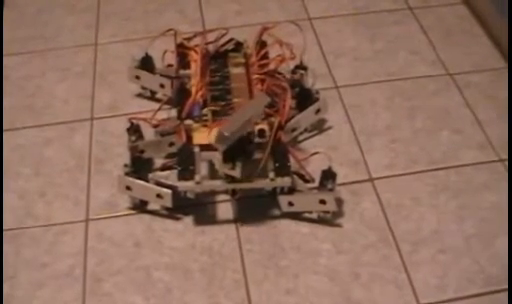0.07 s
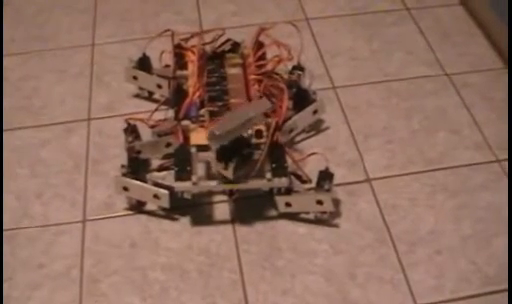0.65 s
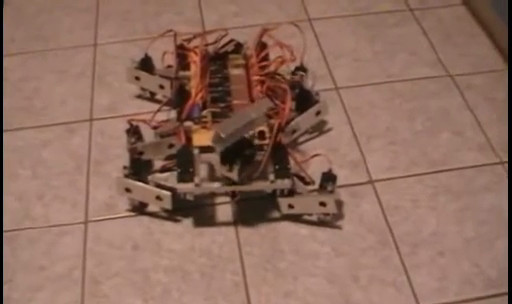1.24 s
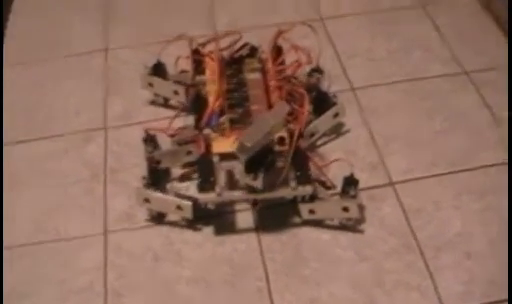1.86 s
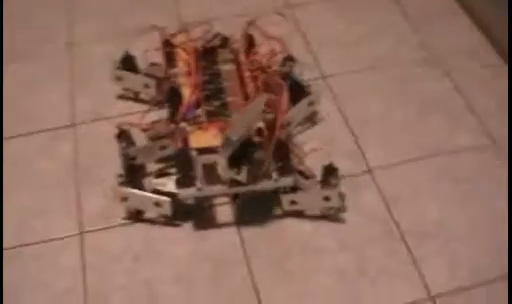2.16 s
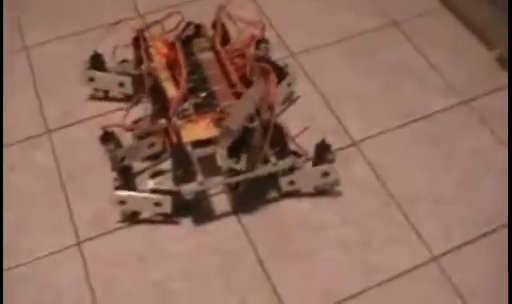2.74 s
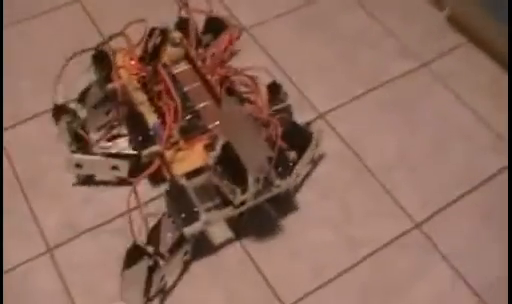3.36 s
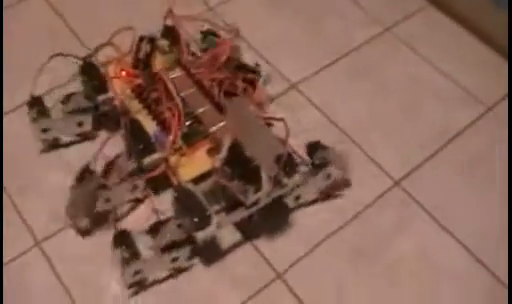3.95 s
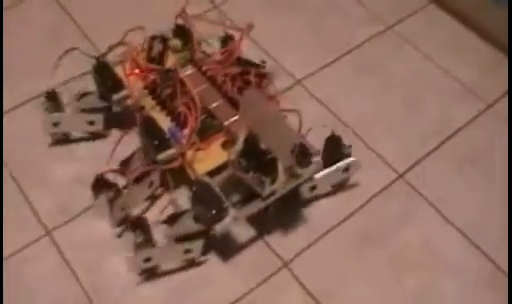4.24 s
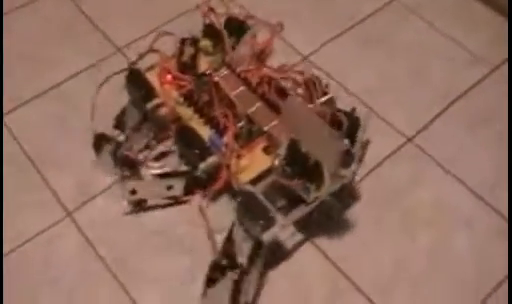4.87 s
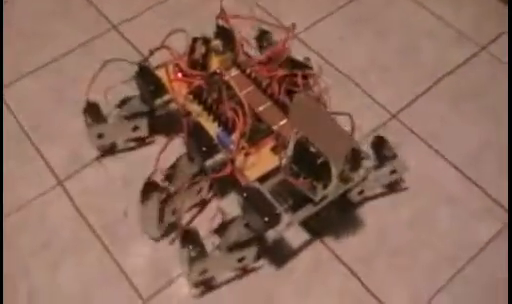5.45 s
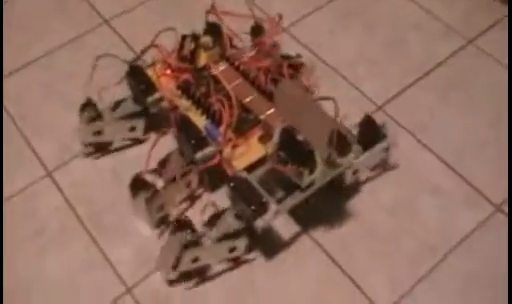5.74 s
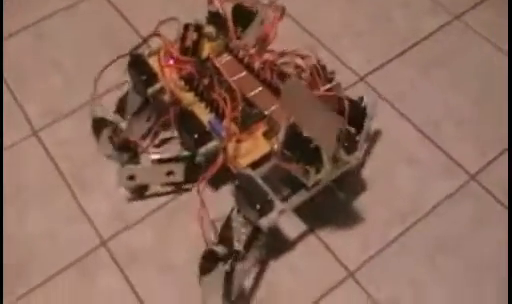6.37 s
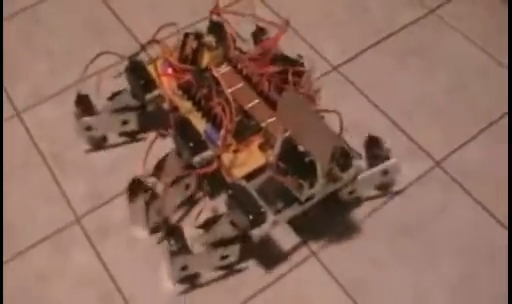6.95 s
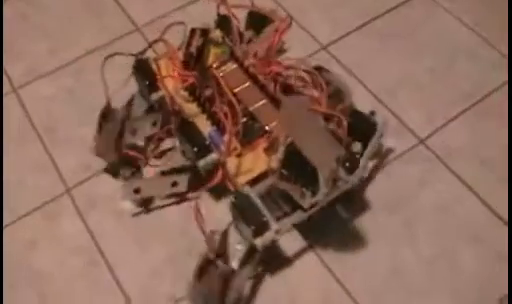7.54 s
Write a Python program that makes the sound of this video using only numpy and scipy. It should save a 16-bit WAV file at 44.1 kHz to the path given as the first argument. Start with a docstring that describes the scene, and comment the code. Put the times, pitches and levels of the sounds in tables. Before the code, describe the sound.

A small metal robot stands in a room, its servo motors giving faint, irregular, high twitches over a low electrical hum and hiss. After nearly three seconds it starts walking, much louder: gears whirr and growl in repeating surges with thin, high whines, while its feet clack down in groups and scrape on the tiles. The frame rattles with a short room echo, heard slightly to the right.

```python
"""A six-legged robot on tiles

A small sheet-metal robot stands still, its servos (the motors in its joints) twitching to hold
their position over a mains hum. Then it walks: the gears whirr in the same surges every stride,
and the feet clack down in groups and drag, making the frame and the room ring."""
import sys
import numpy as np
from scipy import signal
from scipy.fft import rfft, irfft
from scipy.io import wavfile

SR = 44100
rng = np.random.default_rng(int(sys.argv[2]) if len(sys.argv) > 2 else 0)


def inscribe(sig):
    """Save sig as 16-bit PCM at rate SR to the path in sys.argv[1].

    A 1-D sig is mono; a 2-D sig holds one channel per row.
    Samples are clipped to [-1, 1] before scaling.
    """
    pcm = np.round(np.clip(np.atleast_2d(sig).T, -1, 1) * 32767)
    wavfile.write(sys.argv[1], SR, pcm.astype(np.int16))


N = 335160
TIME = np.arange(N) / SR
HZ = np.maximum(np.fft.rfftfreq(2 * N, 1 / SR), 1)


def from_db(db):
    """Turn decibels into a gain to multiply by."""
    return 10 ** (np.asarray(db) / 20)


def unit_power(x):
    """Scale a sound or a filter to an average power of 1."""
    return x / np.sqrt(np.mean(abs(x) ** 2) + 1e-20)


def at_hz(points):
    """Join the points of a table into a curve over all pitches."""
    hz, value = np.transpose(points)
    return np.interp(np.log(HZ), np.log(hz), value)


def drift(per_s):
    """A random wobble around zero that glides to a new value per_s times a second."""
    knots = rng.standard_normal(4000)
    return np.interp(TIME * per_s, np.arange(len(knots)), knots)


def colour(spectrum):
    """A filter shaped by (pitch_hz, relative_db) points; it never rings ahead of the sound."""
    cepstrum = irfft(np.log(from_db(at_hz(spectrum))))
    return unit_power(np.exp(rfft(2 * cepstrum[:N], 2 * N)))


def resonances(modes):
    """A filter that rings at each (pitch_hz, width_hz, relative_db); narrow ones ring longer."""
    return unit_power(sum((-1) ** k * from_db(db) / (1 + 1j * (HZ ** 2 - hz ** 2) / (HZ * width))
                          for k, (hz, width, db) in enumerate(modes)))


def through(x, response):
    """Pass a sound through a filter."""
    return irfft(rfft(x, 2 * N) * response)[..., :N]


def grains(per_s, spread_db, size=N):
    """Random tiny impacts of uneven strength."""
    strengths = from_db(spread_db * np.minimum(rng.exponential(1, size), 4))
    signs = rng.choice([-1, 1], size)
    return unit_power(strengths * signs * (rng.random(size) < per_s / SR))


def swell(start, length, attack_s, release_s):
    """A gain that reaches 1 at the start time, holds, then dies away."""
    rise = np.maximum((start - TIME) / attack_s, 0) ** 2
    fall = np.maximum((TIME - start - length) / release_s, 0)
    return np.exp(-np.minimum(rise + fall, 20))


def walking(start_s=2.75, run_up_db_per_s=220):
    """A gain that rises to 1 as the servos run up for the walk."""
    return from_db(np.clip((TIME - start_s) * run_up_db_per_s, -120, 0))


def every_stride(rows, front_feet_land_s=3.26, stride_s=1.436):
    """Repeat rows for five strides, from one before the given landing of the front feet."""
    return [(front_feet_land_s + k * stride_s + s, *rest) for k in range(-1, 4) for s, *rest in rows]


# Low room noise that comes from all around: pitch_hz, relative_db
RUMBLE_COLOUR = [(20, -12), (60, 4.5), (120, 3.5), (240, 0.5), (480, -4), (960, -9), (1900, -24),
                 (9000, -51.5)]

def room_rumble():
    """A faint rumble, opposite in the two ears so that it sounds wide."""
    return from_db(-55.5) * through(rng.standard_normal(N), colour(RUMBLE_COLOUR)) * [[1], [-1]]


# The tones of the mains hum: pitch_hz, level_db
HUM_TONES = [(59.2, -61), (118.4, -60.5), (172.3, -61.5), (231.5, -60), (436.0, -69.5), (581.4, -65.5),
             (726.7, -65.5), (866.7, -66), (1157, -75.5)]
# The steady hiss of the room: pitch_hz, relative_db
AIR_COLOUR = [(15, -38), (25, -14), (43, -5), (123, -4.5), (143, -19), (230, -6), (288, -12), (624, -13),
              (707, -13), (781, -15), (841, -15.5), (1820, -15.5), (2780, -12), (7550, -12.5), (9690, -15),
              (12600, -51), (21300, -120)]

def background():
    """Mains hum, room hiss and the buzz of powered servos; a soft bump, then a lasting low rustle."""
    hum = sum(from_db(db) * np.sin(2 * np.pi * np.cumsum(hz + 0.39 * drift(4.1)) / SR)
              for hz, db in HUM_TONES)
    air = from_db(-48.5) * through(rng.standard_normal(N), colour(AIR_COLOUR))
    buzz_ring = resonances([(2670, 650, -10), (3560, 95, -4.0), (5750, 360, -4.5), (7660, 200, -5.0)])
    buzz = from_db(-52) * through(grains(per_s=4000, spread_db=1.5), buzz_ring)
    bump_gain = from_db(-51) * np.exp(-((TIME - 1.5) / 0.16) ** 2)
    bump = bump_gain * through(rng.standard_normal(N), resonances([(151, 99, 0)]))
    rustle_gain = from_db(-53) * np.clip((TIME - 1.4) / 0.14, 0, 1)
    rustle_ring = resonances([(298, 340, -0.83), (990, 1360, -0.17)])
    rustle = rustle_gain * through(grains(per_s=1300, spread_db=1.5), rustle_ring)
    return hum + air + buzz + bump + rustle


# Servo twitches while the robot stands: peak_s, half_length_s, level_db
TWITCHES = [(0.12, 0.027, -41), (0.397, 0.034, -38.5), (0.563, .041, -40), (0.746, 0.011, -40.5),
            (.824, 0.043, -45), (0.943, 0.016, -41), (1.046, .01, -46.5), (1.247, 0.046, -48.5),
            (1.386, .014, -43), (1.485, .036, -38), (1.578, .023, -41.5), (1.71, .083, -45.5),
            (2.026, 0.029, -42.5), (2.12, 0.034, -36), (2.301, .025, -42), (2.443, .015, -42),
            (2.528, 0.031, -45.5)]
# How a twitching servo rings: pitch_hz, width_hz, relative_db
TWITCH_RING = [(2400, 760, -7), (3700, 430, -3.5), (5300, 520, 2.5), (6120, 57, 9.5), (6200, 470, -9.5),
               (7000, 220, 2), (7420, 370, 2.5), (9000, 1100, -6.5)]

def holding_servos():
    """Gear teeth chatter in the gaps between them whenever a servo nudges its leg back."""
    gain = sum(from_db(db) * np.exp(-((TIME - s) / half) ** 2) for s, half, db in TWITCHES)
    chatter = grains(per_s=3500, spread_db=1.5) * from_db(2.7 * drift(110))
    return gain * through(chatter, resonances(TWITCH_RING))


# Gear whines, timed within a stride: start_s, length_s, pitch_hz, base_width_hz, level_db
STRIDE_WHINES = [(-.12, 0.16, 704, 130, -38.5), (.09, 0.24, 2545, 165, -40), (.29, .25, 7280, 242, -27),
                 (.745, 0.12, 7280, 347.6, -28), (1.28, .11, 5320, 300, -37)]

def gear_whines():
    """Gears under load sing around one pitch, fluttering as they swell and fade."""
    out = np.zeros(N + 2 * SR)
    for start, length, hz, base_width_hz, db in every_stride(STRIDE_WHINES):
        at, size = int(start * SR), int(length * SR)
        decay = np.exp(-np.pi * 1.5 * base_width_hz / SR)
        noise = [1, 1j] @ rng.standard_normal((2, SR))
        flutter = signal.lfilter([1], [1, -2 * decay, decay ** 2], noise)[-size:]  # smoothed noise
        flutter /= abs(flutter) ** 0.24  # evens out the loudness a little
        tone = np.real(flutter * np.exp(2j * np.pi * hz * TIME[:size]))
        out[at:at + size] += from_db(db) * unit_power(tone) * signal.windows.tukey(size, .5)
    return walking() * out[:N]


def gear_teeth(speed, base_hz, wander, roughness):
    """Four sets of gears at unrelated speeds: each tooth makes a click of uneven strength."""
    out = np.zeros(N)
    for ratio in np.geomspace(.7, 1.4, 4):
        teeth_passed = np.cumsum(base_hz * ratio * speed * np.exp(wander * drift(14))) / SR
        clicks = np.diff(np.floor(teeth_passed), prepend=0)
        out += clicks * (1 + roughness * rng.standard_normal(N))
    return unit_power(out - out.mean())


def leg_reflections(x):
    """Echoes off the swinging metal legs fade in and out, so the tone keeps shifting."""
    out = x
    for _ in range(3):
        echoes = rng.standard_normal(N) * from_db(-60 * TIME / .06)
        gain = from_db(-10) * np.sin(1.4 * drift(11))
        out = out + gain * through(x, rfft(echoes / np.linalg.norm(echoes), 2 * N))
    return unit_power(out)


# Servo moves, timed within a stride: start_s, length_s, whirr_db, growl_above_whirr_db
STRIDE_MOVES = [(-.005, .035, -26.5, 3.5), (.15, .05, -28, -1), (.23, .09, -22.5, -0.5),
                (.335, .16, -22.5, 0), (.56, .09, -29, -9), (.805, .06, -25, 1.5), (.955, .05, -22, 2.5),
                (1.05, .16, -24, -0.5), (1.31, .08, -28.5, -1.5)]

def servo_effort():
    """The gains of whirr and growl, with the moves of all legs added in power."""
    # gears that carry the body's weight never quite rest
    whirr, growl = from_db(-29.5) ** 2, from_db(-28) ** 2
    for start, length, db, growl_db in every_stride(STRIDE_MOVES):
        power = (from_db(db) * swell(start, length, attack_s=.025, release_s=.048)) ** 2
        whirr += power
        growl += power * from_db(growl_db) ** 2
    return np.sqrt([whirr, growl]) * walking()


# The tone of a gearbox: pitch_hz, relative_db
GEARBOX_COLOUR = [(530, -35.5), (900, -22), (1470, -11), (1860, -9), (2180, -8.5), (2850, -2.5), (3510, -5),
                  (3730, -2), (4200, -3.5), (5440, 0), (6910, 2.5), (8260, -2), (9300, -0.5), (9690, -7.5),
                  (12600, -81), (21300, -120)]

def driving_servos():
    """Faster gears whirr louder; load brings out the growl of the gearbox cases."""
    whirr, growl = servo_effort()
    speed = (whirr / whirr.max() + 1e-3) ** .18
    teeth = gear_teeth(speed, base_hz=822.4, wander=.02, roughness=0.67)
    teeth += 1.8 * grains(per_s=14000, spread_db=1.5)
    flicker = from_db(0.81 * drift(170))
    gears = leg_reflections(through(teeth * flicker, colour(GEARBOX_COLOUR)))
    cases = through(gears, 1 / (1 + (HZ / 3300) ** 8))  # the part below 3300 Hz
    return whirr * (gears - cases) + growl * cases


def blows(times, levels_db, crack, rattle_s, echo_db, echo_s=0.5):
    """Each blow is a sharp crack, then loose joints and room echoes fade 60 dB in the given times."""
    out, age = np.zeros(N), TIME[:SR]
    for s, gain in zip(times, from_db(levels_db)):
        at = int(s * SR)
        rattle = from_db(-60 * age / rattle_s) * grains(per_s=3400, spread_db=-1.5, size=SR)
        echoes = from_db(echo_db - 60 * age / echo_s) * rng.standard_normal(SR)
        out[at:at + SR] += gain * (rattle + echoes)[:N - at]
        out[at] += gain * crack
    return out


# How hard each footfall drives each part: start_s, floor_db, frame_db, leg_db, tip_db
FOOTFALLS = [(1.777, -53, -51.5, -46, -42), (2.05, -56, -48, -48, -43), (2.251, -54.5, -49.5, -51, -55),
             (2.38, -63, -50.5, -52, -50), (2.75, -31.5, -21, -28.5, -15), (3.2599, -30.5, -22, -22.5, 2.5),
             (3.38, -31.5, -25, -28, -17), (3.4749, -30, -29, -29, -1), (4.0275, -28, -29.5, -37, -13),
             (4.0435, -30.5, -25, -38, -22), (4.0642, -36.5, -30, -43, -11), (4.193, -35.5, -44, -38, -11),
             (4.6956, -28.5, -20.5, -23.5, -7), (4.8298, -29.5, -22.5, -34, 3.5),
             (4.8961, -30, -29, -31, -16), (4.9267, -33.5, -25, -28.5, -26), (5.4669, -26.5, -26, -41, -27),
             (5.491, -28.5, -26.5, -40, -20), (5.6395, -34, -29.5, -43, -22), (6.134, -32, -22.5, -21, -7),
             (6.2721, -29, -23.5, -32, 2), (6.3484, -29.5, -24, -32, -17), (6.9095, -30.5, -26.5, -37, -9),
             (6.9386, -27.5, -23, -42, -5), (7.103, -27, -26.5, -33, 1), (7.5672, -33, -23, -17, 10)]
# Twice a stride, three legs drag as they take the weight: start_s, strength_db
FOOT_DRAGS = [(2.753, -30), (3.476, -24), (4.195, -28.5), (4.91, -27.5), (5.635, -29), (6.345, -25),
              (7.09, -29.5)]
# How the floor and room, metal frame, legs and foot tips ring: pitch_hz, width_hz, relative_db
FLOOR_RING = [(60, 250, -23), (120.5, 11.6, 2), (168.6, 20, -6), (226.6, 51, -1), (279, 20, -0.5),
              (342.2, 59, -3), (411, 16.7, -0.5)]
FRAME_RING = [(510, 60, -2.5), (545, 33, 1), (681, 58, 1.5), (816, 42, 1), (952, 100, -1.5),
              (1070, 64, -1.5), (1109, 67, -0.5), (1316, 22, -3.5)]
LEG_RING = [(1280, 210, -2), (1490, 140, 4.5), (1742, 67, 2), (2066, 107, 2.5), (2526, 150, 1),
            (3400, 240, -4), (5180, 320, -0.5)]
TIP_RING = [(3500, 1200, -15.5), (5200, 880, 5), (7440, 1100, -3.5)]

def feet():
    """Feet strike the tiles and drag: the floor booms, the frame thuds, legs clack and tips tick."""
    times, floor_db, frame_db, leg_db, tip_db = np.transpose(FOOTFALLS)
    drag = sum(from_db(db) * swell(s, length=0.036, attack_s=0.058, release_s=0.094)
               for s, db in FOOT_DRAGS)
    shudder = from_db(-45)
    scrape = walking() * np.hypot(drag, shudder) * grains(per_s=1500, spread_db=-0.5)
    booms = blows(times, floor_db, crack=23.7, rattle_s=0.18, echo_db=-1) + from_db(-6) * scrape
    thuds = blows(times, frame_db, crack=14, rattle_s=0.12, echo_db=-2) + from_db(-2.5) * scrape
    clacks = blows(times, leg_db, crack=17.8, rattle_s=0.11, echo_db=-5.5)
    ticks = np.zeros(N)
    ticks[(times * SR).astype(int)] = from_db(tip_db)
    return (through(booms, resonances(FLOOR_RING)) + through(thuds, resonances(FRAME_RING))
            + through(clacks, resonances(LEG_RING)) + through(ticks, resonances(TIP_RING)))


# Where the two ears hear most alike (1 is most): pitch_hz, likeness
EAR_LIKENESS = [(30, .85), (100, 0.81), (300, 0.92), (1000, 1), (3000, 0.96), (9000, 1)]
# The balance between the ears at a lean of 1: pitch_hz, left_minus_right_db
EAR_BALANCE = [(60, -4), (160, -3.5), (450, -2), (1230, -2), (3370, -1.5), (9240, -3)]

def placed(x, lean):
    """Set a sound a little to one side; wall echoes reach the two ears differently."""
    walls = rng.standard_normal(N) * from_db(-60 * TIME / .4) * (TIME > .004)
    likeness = np.clip(at_hz(EAR_LIKENESS), 0, .999)
    width = 0.57 * np.sqrt((1 - likeness) / (1 + likeness))
    side = through(x, rfft(walls / np.linalg.norm(walls), 2 * N) * width)
    balance = from_db(lean * at_hz(EAR_BALANCE) * [[.5], [-.5]])
    return through(np.array([x + side, x - side]), balance)


def scene():
    """The robot stands almost straight ahead and walks a little further to the side."""
    standing = placed(holding_servos() + background(), lean=0.44)
    moving = placed(driving_servos() + gear_whines() + feet(), lean=0.91)
    return standing + moving + room_rumble()


def record(dry):
    """Clip the highest peaks and cut the treble steeply above 9750 Hz."""
    treble_cut = signal.ellip(12, .2, 90, 9750, fs=SR, output="sos")
    return signal.sosfilt(treble_cut, np.clip(dry, -.85, .85))


dry = scene()
out = record(dry)
inscribe(out)
```